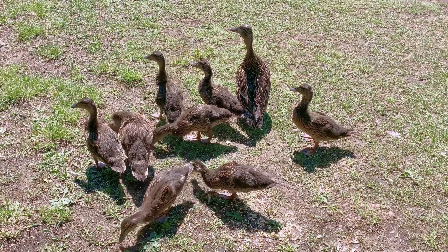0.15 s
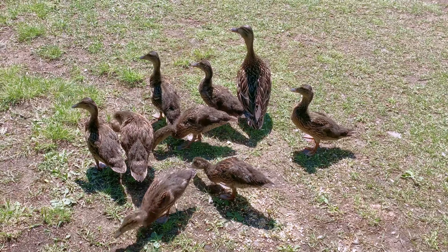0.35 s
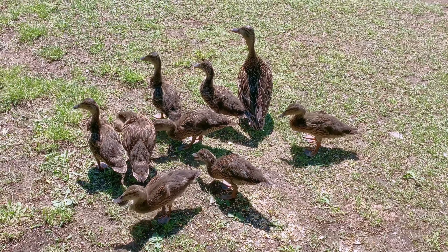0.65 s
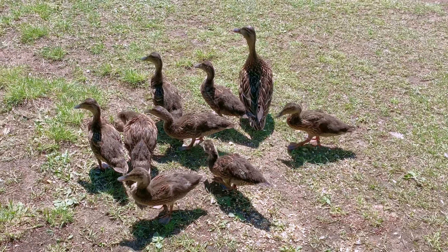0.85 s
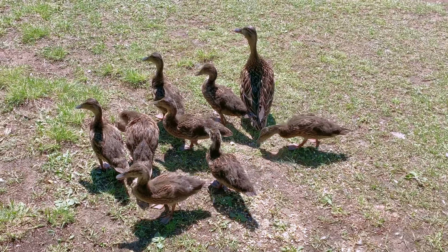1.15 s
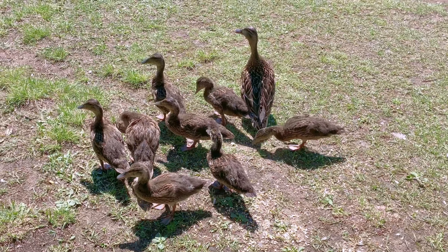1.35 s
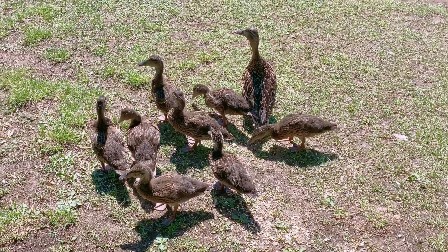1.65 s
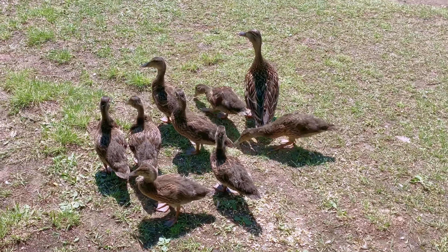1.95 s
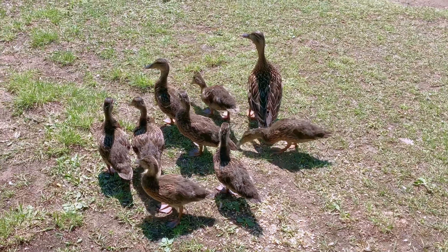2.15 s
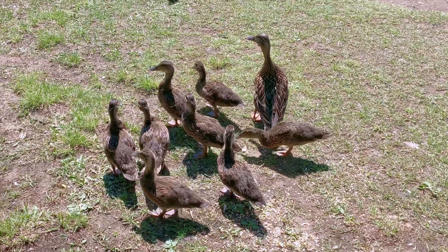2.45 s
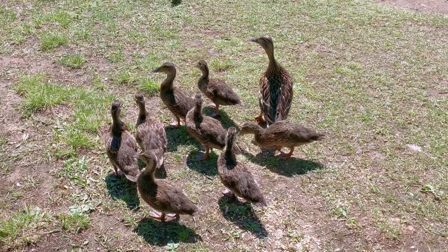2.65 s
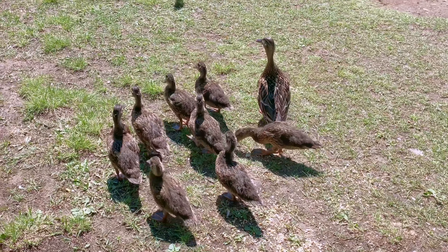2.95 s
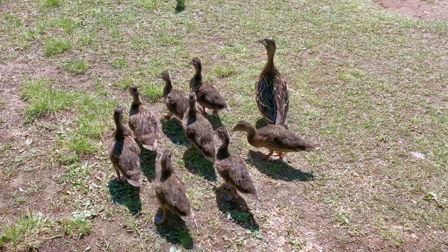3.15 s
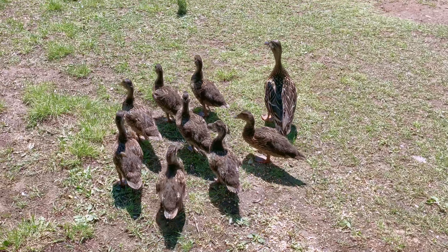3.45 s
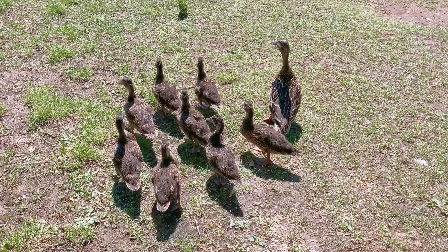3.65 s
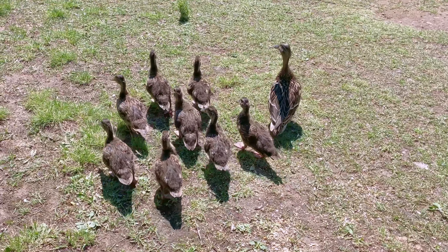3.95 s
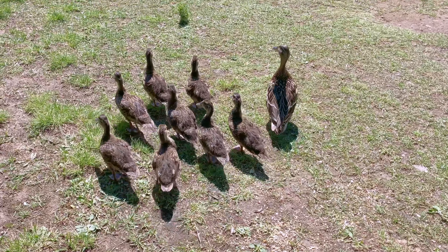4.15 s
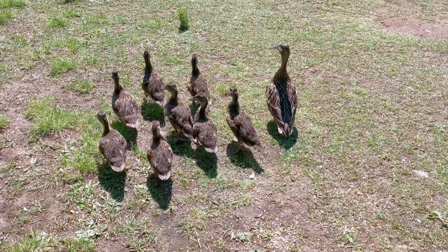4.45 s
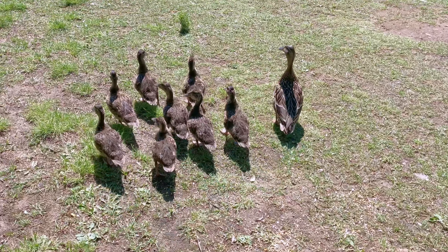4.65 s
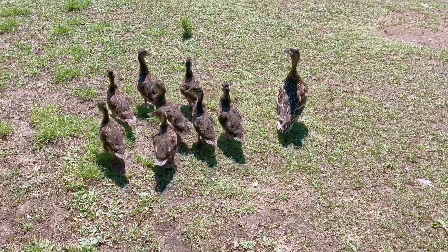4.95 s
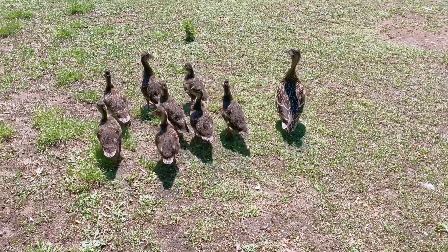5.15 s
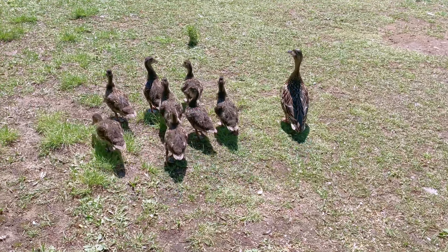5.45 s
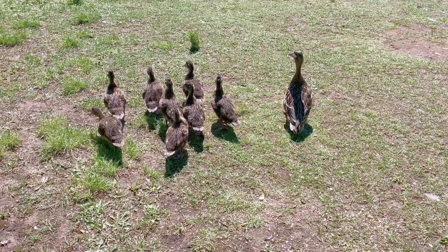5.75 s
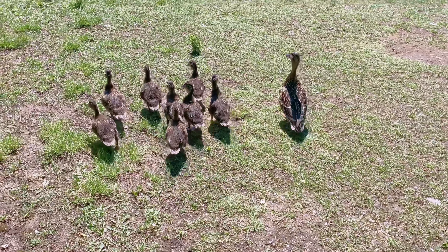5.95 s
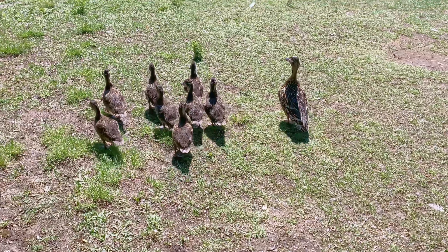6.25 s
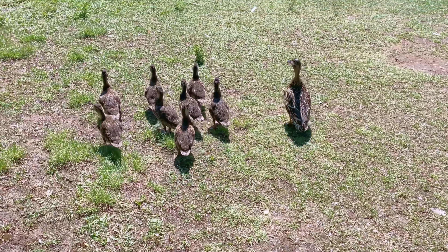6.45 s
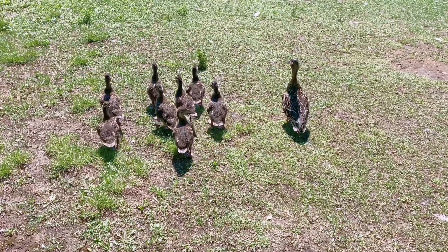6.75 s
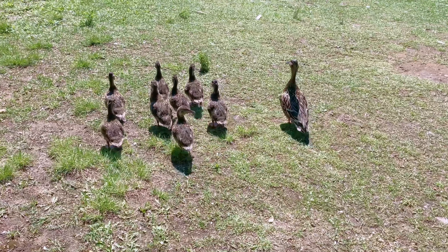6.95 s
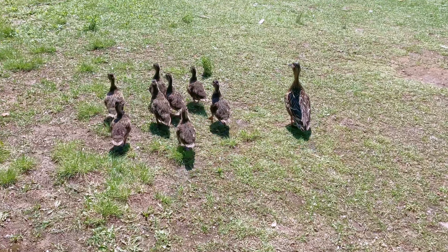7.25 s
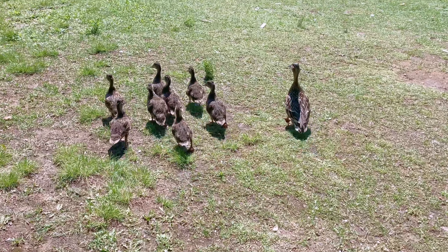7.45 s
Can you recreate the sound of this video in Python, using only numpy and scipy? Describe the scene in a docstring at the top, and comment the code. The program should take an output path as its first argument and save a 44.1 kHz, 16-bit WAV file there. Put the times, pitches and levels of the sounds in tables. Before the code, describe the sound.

Outdoors, one microphone picks up a continuous smooth hiss of faraway falling water, nearly as strong as the birds. Over it ducklings a few metres off make brief, sweet, slightly rattling peeps in irregular clusters, busiest in the later half, with fainter ones behind. A few low coos appear early, thin falling songbird chirps flick by, and feet tick lightly in dry grass. A low motor hum is almost inaudible. Dry, centred, without echo.

```python
"""Ducklings on a grassy bank

Ducklings whistle short gliding peeps a few metres away: near-pure tones weighted by a throat resonance.
A lower voice coos three times and a far songbird chirps, built from the same whistle.
Feet rustle dry grass in bright noise bursts; distant falling water is a coloured hiss over a
faint motor hum of two sine partials. One microphone hears it all."""
import sys
import numpy as np
from scipy import signal
from scipy.fft import rfft, irfft, next_fast_len
from scipy.io import wavfile
from scipy.ndimage import uniform_filter1d

SR = 44100
rng = np.random.default_rng(int(sys.argv[2]) if len(sys.argv) > 2 else 0)


def wav_record(signal):
    """Record a signal, one row per channel, as 16-bit PCM in the file named by sys.argv[1]."""
    frames = np.transpose(np.atleast_2d(signal))
    bounded = np.clip(frames, -1, 1)
    # unit amplitude maps onto the largest positive 16-bit level
    quanta = np.round(bounded * 32767).astype(np.int16)
    wavfile.write(sys.argv[1], SR, quanta)


N = 335601

# Duckling peeps. Each row: start in seconds, length in seconds, scoop up into the first pitch in Hz
# (negative slides down), first, middle and last pitch in Hz, level in dB before the throat weighting.
PEEPS = [ (.405, 0.035, 60, 1695, 1620, 1530, -44), (.537, .043, 330, 1910, 1970, 1980, -44),
         (.582, .055, -220, 1720, 1680, 1490, -40.5), (.661, .038, 430, 2070, 2090, 1990, -34.5),
         (.69, 0.061, -46, 1920, 1840, 1610, -32.5), (.745, 0.032, 150, 2060, 1990, 1790, -38),
         (1.064, .072, 300, 1990, 1860, 1480, -38.5), (1.285, 0.049, 97, 1840, 1950, 1790, -45),
         (1.352, 0.053, 90, 1740, 1760, 1650, -41), (1.455, .045, -60, 1870, 1750, 1600, -47),
         (1.515, 0.034, -130, 1646, 1600, 1550, -45), (1.67, .065, 60, 1890, 1890, 1650, -44.5),
         (1.86, .055, -90, 1500, 1390, 1350, -46), (2.072, .046, -270, 2000, 1760, 1550, -40),
         (2.372, 0.058, 80, 1960, 1955, 1600, -37.5), (2.438, 0.033, 60, 1790, 1780, 1730, -45),
         (2.468, 0.081, -280, 2106, 1854, 1934, -36.5), (2.715, 0.052, 145, 2000, 2087, 1820, -35.5),
         (2.7, .066, -80, 1960, 1800, 1860, -41), (2.945, 0.045, 108, 2020, 2050, 2030, -46),
         (3.268, .045, -440, 1484, 1430, 1380, -35.5), (3.304, .082, 280, 2010, 1890, 1720, -39),
         (3.375, 0.094, -32, 1685, 1710, 1620, -40.5), (3.602, .08, 270, 1940, 1700, 1590, -39.5),
         (3.662, .088, 180, 1930, 1860, 1850, -37.5), (3.71, 0.024, -200, 1650, 1580, 1550, -39),
         (3.92, 0.089, 47, 1810, 1830, 1800, -39.5), (3.98, .04, -21, 1820, 1730, 1610, -40),
         (4.185, 0.12, 183, 1980, 1690, 1604, -38), (4.245, .05, -270, 2280, 1970, 1730, -42),
         (4.475, 0.085, -210, 1950, 1760, 2000, -37.5), (4.638, .06, -130, 1760, 1620, 1480, -43),
         (4.878, .067, 132, 1750, 1760, 1800, -41), (4.958, 0.045, -100, 1800, 1690, 1570, -41),
         (5.095, 0.079, -70, 1720, 1604, 1700, -45), (5.162, .08, 30, 2030, 1864, 2010, -37),
         (5.23, 0.045, -70, 1634, 1570, 1520, -39.5), (5.385, .075, -60, 2080, 1920, 1820, -41.5),
         (5.532, .08, 150, 2320, 1930, 1590, -39), (5.535, 0.066, -10, 1760, 1773, 1825, -40),
         (5.705, 0.027, 10, 1960, 1900, 1830, -43), (5.74, 0.063, 200, 1920, 2030, 1660, -38),
         (5.815, 0.03, 400, 1820, 1900, 1970, -42), (5.845, .095, 202, 1870, 1765, 1550, -37.5),
         (5.845, 0.06, -88, 1660, 1550, 1510, -40), (5.848, .064, 202, 2170, 1960, 1675, -39.5),
         (6.043, .03, -100, 1567, 1460, 1380, -40.5), (6.115, .085, -240, 1740, 1520, 1590, -39.5),
         (6.192, 0.074, -17, 1830, 1680, 1620, -36.5), (6.412, .065, -60, 1720, 1590, 1460, -39),
         (6.5, .032, -110, 1700, 1690, 1690, -45), (6.54, 0.042, 60, 1765, 1750, 1640, -44),
         (6.744, 0.094, 142, 2144, 1730, 1830, -38.5), (6.845, 0.062, 50, 1710, 1730, 1610, -43),
         (7.06, 0.03, -17, 1555, 1550, 1520, -46), (7.06, .085, -320, 1810, 1680, 1720, -39),
         (7.133, .067, 140, 2100, 1860, 1640, -39), (7.455, 0.076, 20, 1720, 1742, 1684, -39.5), ]
# Low coos. Each row: start in seconds, length in seconds, scoop up into the first pitch in Hz,
# first, middle and last pitch in Hz, level in dB.
COOS = [(.165, .075, 39, 698, 768, 825, -45.5), (2.325, 0.12, 45, 743, 812, 800, -47),
        (2.492, .07, 20, 640, 690, 765, -47.5)]
# Songbird chirps. Each row: start in seconds, length in seconds, first pitch in Hz, level in dB.
CHIRPS = [(2.195, .03, 5400, -56), (2.385, .022, 3000, -49), (4.462, .024, 3200, -50),
          (5.962, .05, 5000, -53), (6.092, .053, 4450, -52), (6.34, .035, 4300, -56)]
# Steps in dry grass. Each row: moment in seconds, peak level in dB, length in seconds, band centre in Hz.
GRASS_STEPS = [(.236, -63, .01, 12500), (.495, -61, .01, 13000), (.93, -68, .03, 14000),
               (1.08, -65, .03, 13000), (1.29, -68, .02, 13000), (1.845, -61, .012, 11000),
               (2.055, -58, .045, 11000), (2.475, -60, .018, 10800), (3.036, -50, .024, 8600),
               (3.335, -62, .014, 13000), (4.542, -59, .014, 9800), (5.78, -64, .1, 11500),
               (6.5, -69, .04, 14000), (7.18, -55, .014, 11500)]
# Colour of the falling water. Each row: frequency in Hz, relative density in dB per Hz.
WATER_COLOUR = [(15, -80), (25, -57.5), (254, -21), (423, -19.5), (706, -3.5), (900, -5.5), (1310, 0),
                (1500, -2.5), (1910, -0.5), (2440, -7.5), (3960, -12.5), (4530, -12), (7760, -21),
                (13000, -31.5), (15600, -36.5)]
# Partials of the motor. Each row: frequency in Hz, level in dB before the wavering.
HUM_PARTIALS = [(73, -98), (146, -87)]
# The hum wavers. Each row: time in seconds, level change in dB.
HUM_WAVER = [(0, -3), (.7, 8.5), (1.4, -11), (2.2, -2), (2.8, 7.5), (3.8, 0.5), (4.5, -3), (5.2, 5.5),
             (5.8, -4), (7.6, 0)]

WATER_DB = -41.5  # rms of the whole hiss
TOP_HZ = 15600  # the recorder's upper limit
CHIRP_FALL_HZ_PER_S = 19000
SCOOP_S = .017  # time to slide into the first pitch
# level change at the start of a call, after the scoop, and at the end of a peep or coo
ONSET_DB, SCOOPED_DB, PEEP_TAIL_DB, COO_TAIL_DB = -3, -.5, -3.5, -1.5
THROAT_HZ, THROAT_WIDTH_HZ = 1880, 900
CHATTER_HZ, CHATTER_SPREAD_HZ, CHATTER_FALL_HZ = 1650, 400, 250
CHATTER_DB = -51  # loudest of the faint peeps, before the throat weighting


def undb(db):
    """Gain of a level in dB."""
    return 10 ** (np.asarray(db) / 20)


def unit(x):
    """Scale to rms 1."""
    return x / np.sqrt(np.mean(x ** 2))


def walk(rate):
    """Random levels, a new one every 1 / rate seconds, slewed twice; spread about 1."""
    hold = int(SR / rate)
    held = np.repeat(rng.standard_normal(N // hold + 1), hold)
    slewed = uniform_filter1d(uniform_filter1d(held, hold), hold)
    return unit(slewed)[:N]


def whistles(calls, fade_s, waver, flutter_db, overtone_db, trill=0):
    """Near-pure gliding tones: rounded pitch bends, a slightly unsteady breath, a weak second partial."""
    out = np.zeros(N)
    drift, flutter = walk(120), walk(90)
    bend = int(.006 * SR)  # pitch corners rounded over 6 ms
    for call in calls:
        s, hz, db = np.transpose(call)
        start = max(int((s[0] - fade_s) * SR), 0)
        stop = min(int((s[-1] + fade_s) * SR), N)
        at = np.arange(start, stop)
        t = at / SR
        since_start = t - t[0]

        # the glide runs on while the call fades in and out
        first_slope, last_slope = np.diff(hz)[[0, -1]] / np.diff(s)[[0, -1]]
        glide = np.interp(t, s, hz)
        glide += first_slope * np.minimum(t - s[0], 0)
        glide += last_slope * np.maximum(t - s[-1], 0)
        pitch = uniform_filter1d(glide, bend, mode="nearest") * (1 + waver * drift[at])

        # the breath swells in and dies out round the first and last point
        edge = np.clip(np.minimum(since_start, t[-1] - t) / (2 * fade_s), 0, 1)
        fade = np.sin(np.pi / 2 * edge) ** 2
        gain = undb(np.interp(t, s, db) + flutter_db * flutter[at]) * fade

        # the throat rattles at the start of a call, in some calls more than others
        depth = trill * rng.random() * np.exp(-since_start / .05)
        rattle_hz = rng.uniform(100, 190)
        gain *= 1 + depth * np.sin(2 * np.pi * rattle_hz * since_start)

        phase = 2 * np.pi * np.cumsum(pitch) / SR
        tone = np.sin(phase) + undb(overtone_db) * np.sin(2 * phase)
        out[at] += np.sqrt(2) * gain * tone  # root 2: levels are rms
    return out


def shaped(rows, tail_db):
    """Calls slide into pitch, peak midway and weaken; gives (seconds, pitch Hz, level dB) points."""
    calls = []
    for s, length, scoop_hz, first_hz, middle_hz, last_hz, db in rows:
        calls.append([(s, first_hz - scoop_hz, db + ONSET_DB),
                      (s + SCOOP_S, first_hz, db + SCOOPED_DB),
                      (s + (SCOOP_S + length) / 2, middle_hz, db),
                      (s + length, last_hz, db + tail_db)])
    return calls


def throated(calls):
    """A duckling is loudest where its pitch meets the throat resonance and weaker away from it."""
    def loss_db(hz):
        return 10 * np.log10(1 + (2 * (hz - THROAT_HZ) / THROAT_WIDTH_HZ) ** 2)
    return [[(s, hz, db - loss_db(hz)) for s, hz, db in call] for call in calls]


def chatter(count, top_db):
    """Birds facing away: faint falling peeps at random moments, scooped up or down, in PEEPS columns."""
    when, high, arch, soft = rng.random((count, 4)).T
    start = when * (N / SR - .1)
    length = .035 + .025 * high  # higher peeps last longer
    scoop_hz = 300 * arch - 150
    first_hz = CHATTER_HZ + CHATTER_SPREAD_HZ * high
    middle_hz = first_hz - CHATTER_FALL_HZ / 3
    last_hz = first_hz - CHATTER_FALL_HZ
    return list(zip(start, length, scoop_hz, first_hz, middle_hz, last_hz, top_db - 4 * soft))


def ducklings():
    """Near and faint peeps: whistles weighted by the throat, with a rattling onset."""
    flock = throated(shaped(PEEPS + chatter(count=26, top_db=CHATTER_DB), PEEP_TAIL_DB))
    return whistles(flock, fade_s=.006, waver=.007, flutter_db=1.4, overtone_db=-28, trill=.45)


def low_coos():
    """A lower voice: the same whistle with a stronger second partial and no rattle."""
    return whistles(shaped(COOS, COO_TAIL_DB), fade_s=.008, waver=.006, flutter_db=.8, overtone_db=-15)


def falling(rows):
    """Chirps slide down at one steady rate, loudest midway; gives points for the whistle."""
    calls = []
    for s, length, hz, db in rows:
        points = [(share * length, dip_db) for share, dip_db in [(0, -3), (.5, 0), (1, -3)]]
        calls.append([(s + after, hz - CHIRP_FALL_HZ_PER_S * after, db + dip_db) for after, dip_db in points])
    return calls


def songbird():
    """Far falling chirps, almost pure tones."""
    return whistles(falling(CHIRPS), fade_s=.005, waver=.003, flutter_db=1.2, overtone_db=-40)


def grass(grain_db, stray_count, stray_db):
    """Each step is a short burst of crackling blades: bright grainy noise an octave wide."""
    out, t = np.zeros(N), np.arange(N) / SR
    crackle = rng.standard_normal(N) * undb(grain_db * rng.exponential(size=N))
    # faint stirrings fall at random among the clear steps
    chance = rng.random((stray_count, 4))
    strays = [(.1 + a * (N / SR - .2), stray_db + 4 * b, .008 + .03 * c, 10000 + 4500 * d)
              for a, b, c, d in chance]
    for s, db, length, hz in GRASS_STEPS + strays:
        at = slice(int((s - 2 * length) * SR), int((s + 2 * length) * SR))
        band = signal.butter(2, [hz * .65, hz * 1.3], "bandpass", fs=SR, output="sos")
        burst = unit(signal.sosfilt(band, crackle[at]))
        swell = np.exp(-2 * ((t[at] - s) / (length / 2)) ** 2)
        out[at] += undb(db) * burst * swell
    return out


def water(swell_db, flicker_db, spray_db):
    """Smooth distant hiss: octave bands swell a little together, flicker alone, most in the treble."""
    size = next_fast_len(N)
    hz = np.maximum(np.arange(size // 2 + 1) * SR / size, 1)
    colour_hz, colour_db = np.transpose(WATER_COLOUR)
    colour = undb(np.interp(np.log(hz), np.log(colour_hz), colour_db))
    spectrum = rfft(rng.standard_normal(size)) * colour
    out, swell = 0, walk(0.3)
    for centre in 31.25 * 2. ** np.arange(10):
        # overlapping bands, each fading out one octave from its centre
        share = np.cos(np.pi / 2 * np.clip(np.log2(hz / centre), -1, 1)) ** 2
        band = irfft(spectrum * share, size)[:N]
        unsteady_db = flicker_db + spray_db * (centre / 16000) ** 2
        out = out + band * undb(swell_db * swell + unsteady_db * walk(12))
    return undb(WATER_DB) * unit(out)


def hum(waver_db):
    """Two partials of a far motor, wavering together and also separately."""
    t = np.arange(N) / SR
    shared_db = np.interp(t, *np.transpose(HUM_WAVER))
    out = np.zeros(N)
    for hz, db in HUM_PARTIALS:
        gain = undb(db + shared_db + waver_db * walk(2.84))
        out += np.sqrt(2) * gain * np.sin(2 * np.pi * hz * t)
    return out


def scene():
    """Everything reaches one microphone, so both channels are alike."""
    mono = ducklings() + low_coos() + songbird()
    mono = mono + grass(grain_db=3.6, stray_count=30, stray_db=-72)
    mono = mono + water(swell_db=.1, flicker_db=.25, spray_db=.6)
    mono = mono + hum(waver_db=1.0)
    return np.array([mono, mono])


def record(dry):
    """The recorder cuts the top steeply: an elliptic low-pass."""
    return signal.sosfilt(signal.ellip(10, .2, 70, TOP_HZ, fs=SR, output="sos"), dry)


dry = scene()
out = record(dry)
wav_record(out)
```